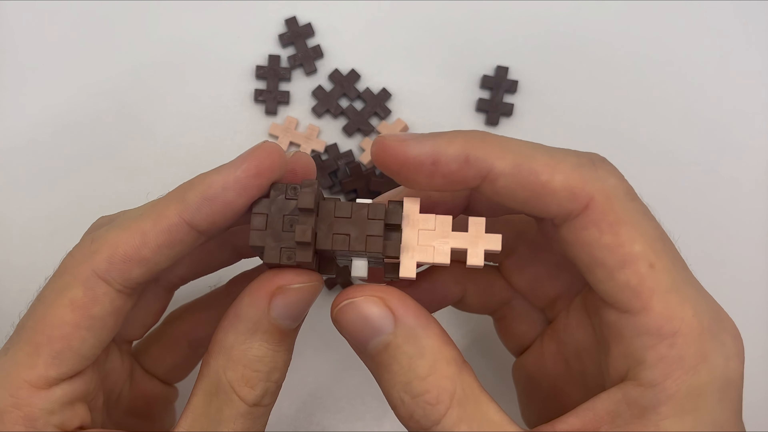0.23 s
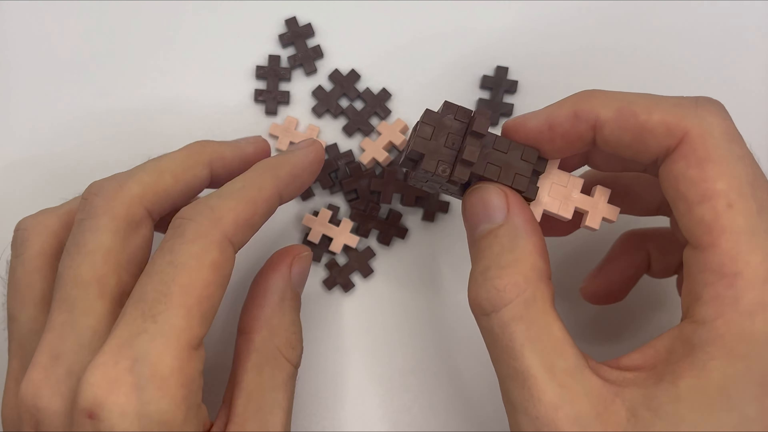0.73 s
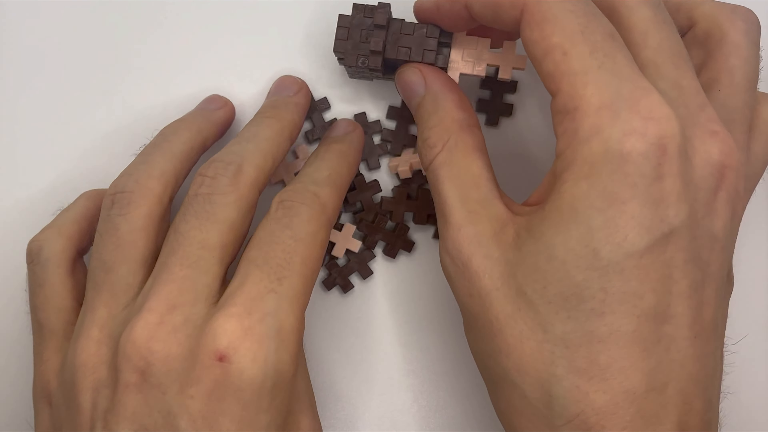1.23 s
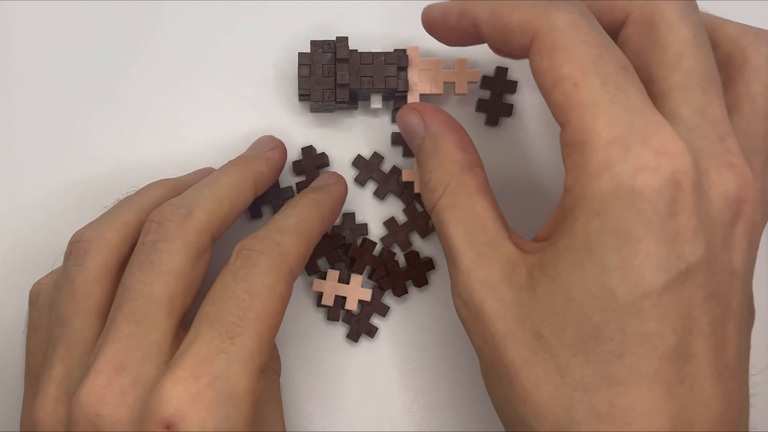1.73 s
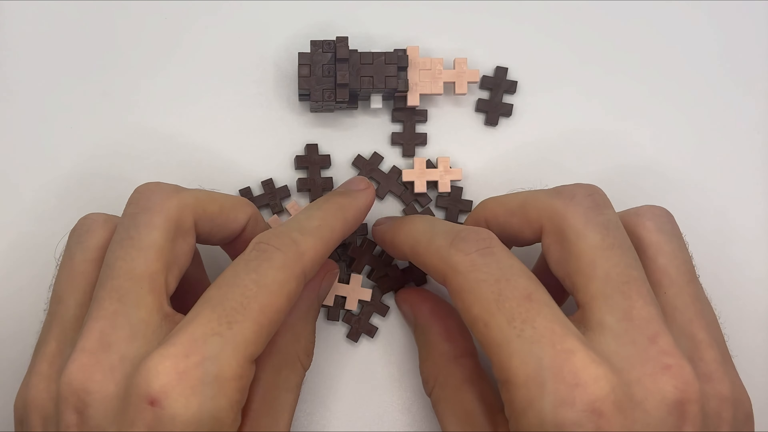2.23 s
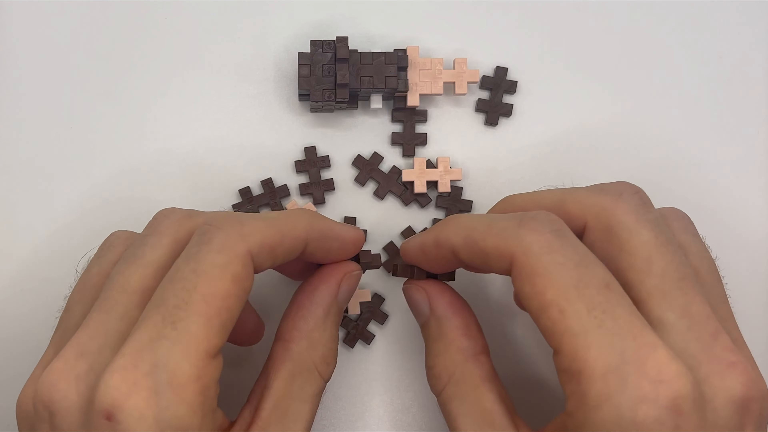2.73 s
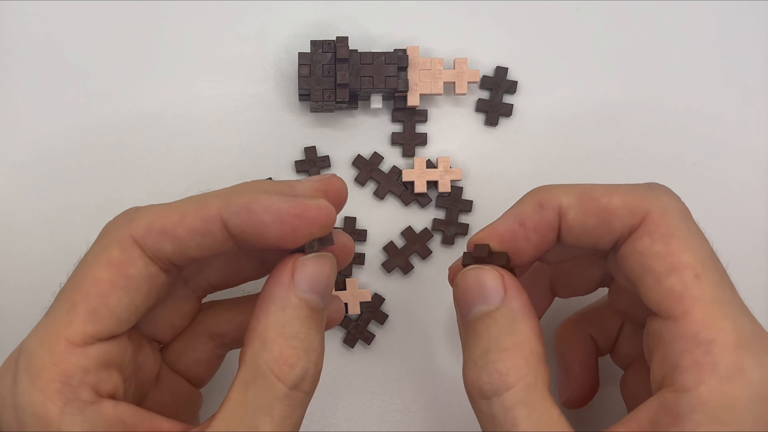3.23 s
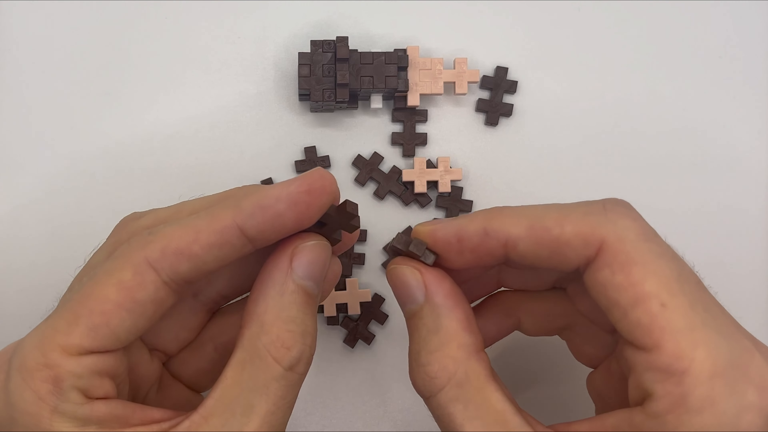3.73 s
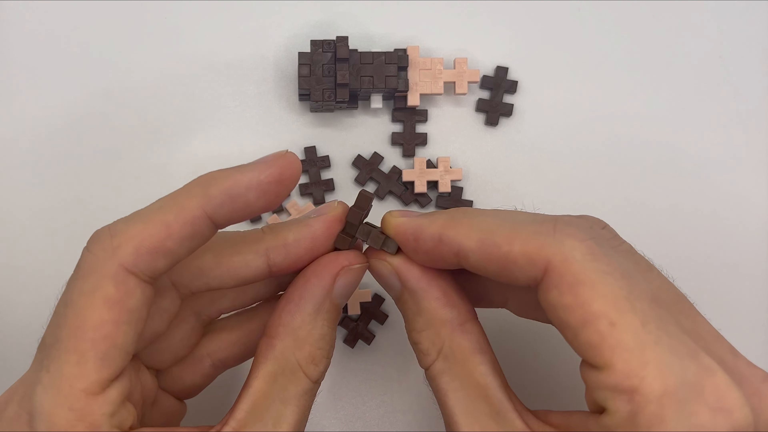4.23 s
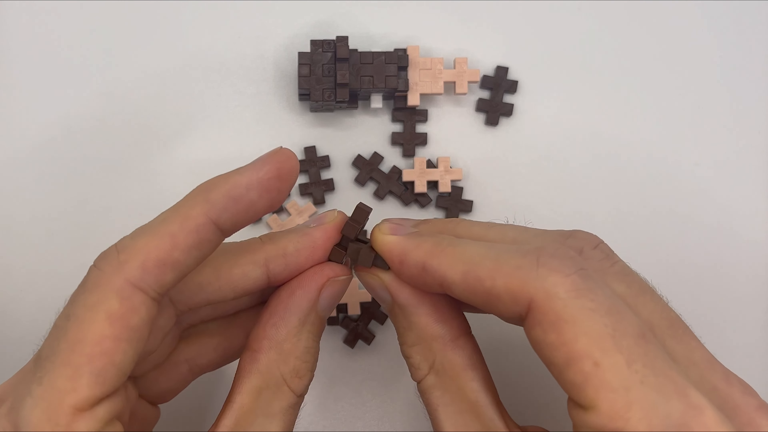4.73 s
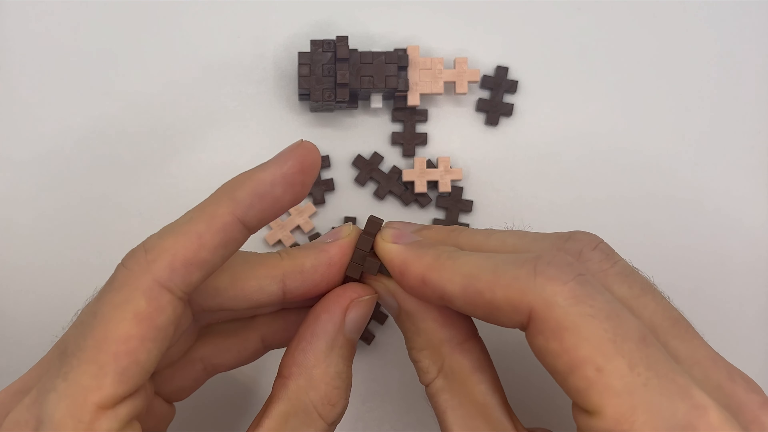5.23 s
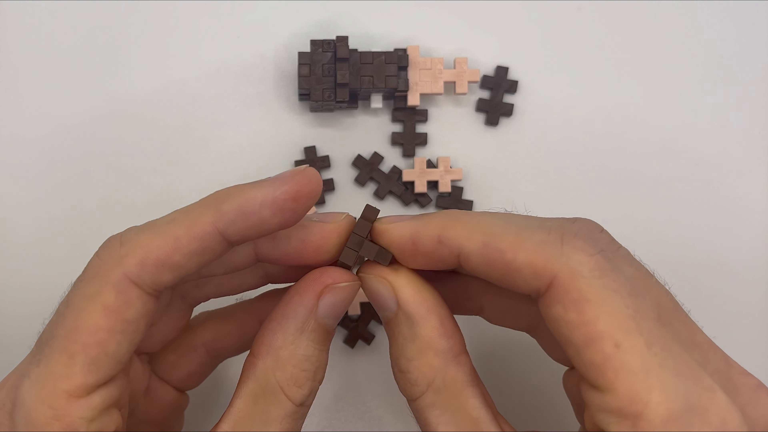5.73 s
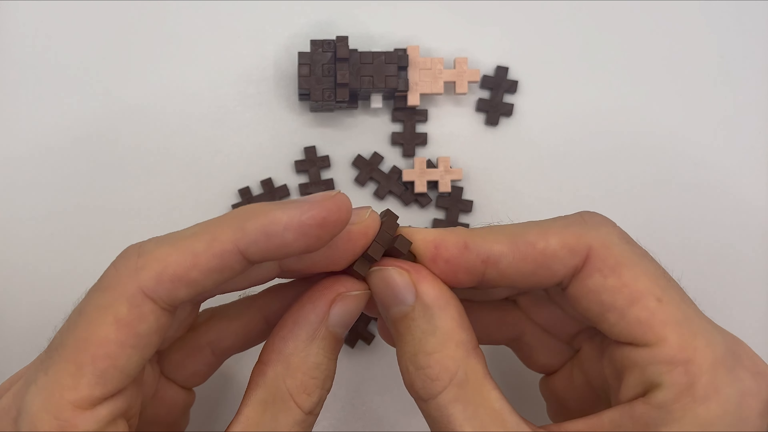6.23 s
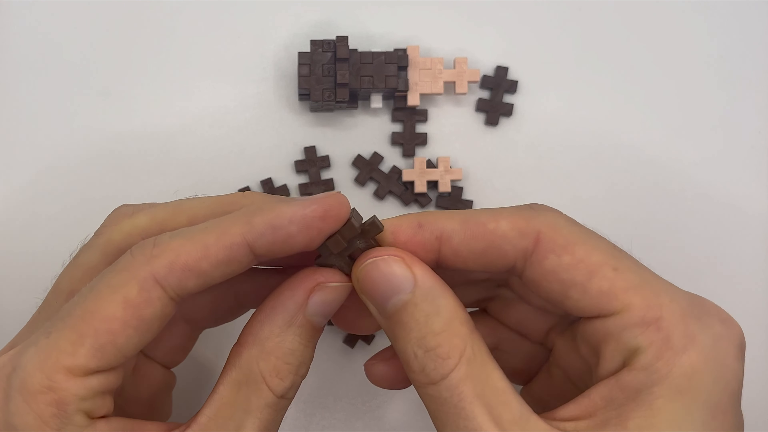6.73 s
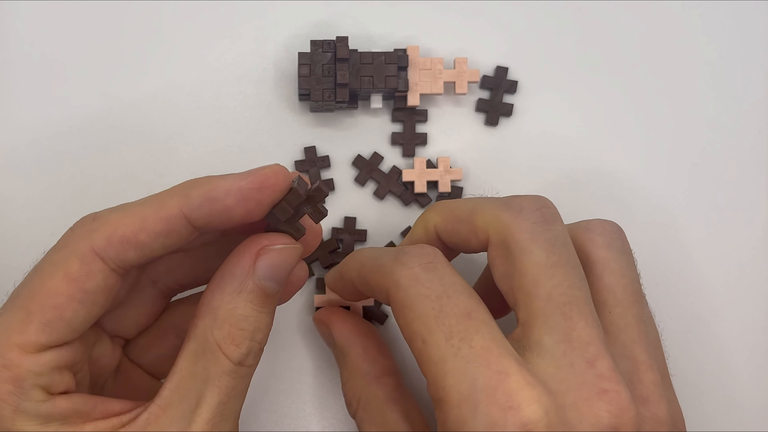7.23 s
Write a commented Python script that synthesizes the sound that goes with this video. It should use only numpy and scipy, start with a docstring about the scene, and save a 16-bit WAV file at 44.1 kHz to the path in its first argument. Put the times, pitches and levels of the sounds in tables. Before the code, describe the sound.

A small plastic model scrapes and clacks down on a tabletop, loose pieces rattle, then faint joint ticks and a last sharp click in a quiet room.

```python
"""Plastic pieces on a table

Hands slide a small plastic model across a table, set it down and pick loose pieces from a heap.
Knocks and drags excite the modes of the table top; heavy contacts shake the whole table.
Joints tick in short, finger-damped noise bursts. Skin hisses and the table rumbles under leaning arms.
Behind: filtered noise for still air, narrow noise bands for a far fan's hum."""
import sys
import numpy as np
from scipy import signal
from scipy.fft import rfft, irfft, next_fast_len
from scipy.io import wavfile
from scipy.ndimage import uniform_filter1d

SR = 44100
rng = np.random.default_rng(int(sys.argv[2]) if len(sys.argv) > 2 else 0)


def log_audio(samples):
    """Write samples as a 16-bit WAV file to the path given in sys.argv[1]."""
    # one column per channel
    frames = np.atleast_2d(samples).T
    # limit to full scale, then quantise
    limited = np.clip(frames, -1, 1)
    pcm = np.round(limited * 32767).astype(np.int16)
    wavfile.write(sys.argv[1], SR, pcm)


N = 329868
TIME_S = np.arange(N) / SR
RING_S = np.arange(16384) / SR  # time axis of one ring or burst


def amp(db):
    """Decibels to gain."""
    return 10 ** (np.asarray(db) / 20)


def unit(x):
    """Scales to rms 1."""
    return x / np.sqrt(np.mean(x ** 2) + 1e-30)


def read(points, hz):
    """Interpolates a (Hz, dB) spectrum on a log-frequency axis."""
    f, db = np.transpose(points)
    return np.interp(np.log(hz + 1), np.log(f + 1), db)


def add(mix, start_s, sound):
    """Mixes a sound in at start_s."""
    part = mix[max(round(start_s * SR), 0):][:len(sound)]
    part += sound[:len(part)]


def coloured(x, *spectra):
    """Causal (minimum-phase) filter with the dB sum of the given spectra."""
    size = next_fast_len(len(x) + 4096)
    hz = abs(np.fft.fftfreq(size, 1 / SR))
    gain_db = sum(read(points, hz) for points in spectra)
    log_gain = np.log(amp(gain_db))
    response = np.exp(np.conj(signal.hilbert(log_gain)))  # phase from the log gain
    return np.fft.ifft(np.fft.fft(x, size) * response).real[:len(x)]


def noise(points):
    """Steady noise of rms 1 with a given spectrum."""
    gain = amp(read(points, np.fft.rfftfreq(N, 1 / SR)))
    return unit(irfft(rfft(rng.standard_normal(N)) * gain, N))


def hump(hz, db, octaves):
    """Spectrum points of one damped resonance."""
    return [(hz * 2 ** (octaves * k), db / (1 + (2 * k) ** 2)) for k in np.linspace(-4, 4, 33)]


def flat(x, width_hz=450):
    """Evens out a burst's broad colour; keeps its timing and fine ripple."""
    power = uniform_filter1d(abs(rfft(x)) ** 2, int(width_hz * len(x) / SR))
    inverse_db = -10 * np.log10(power)
    return coloured(x, np.transpose([np.fft.rfftfreq(len(x), 1 / SR), inverse_db]))


def dying(t60_s):
    """Envelope that falls 60 dB in t60_s."""
    return np.exp(-np.log(1000) * RING_S / t60_s)


def scatter(db, t60_s):
    """A dying noise cloud of reflections with a given energy."""
    cloud = rng.standard_normal(len(RING_S)) * dying(t60_s) * (RING_S > .0006)
    return amp(db) * cloud / np.linalg.norm(cloud)


def strike(sound, db):
    """Sets the rms of a click's first 4 ms, high-passed at 500 Hz."""
    high_pass = signal.butter(2, 500, "high", fs=SR, output="sos")
    attack = signal.sosfilt(high_pass, sound[:SR // 250])
    return sound * amp(db) / np.sqrt(np.mean(attack ** 2))


def stroke(start_s, end_s, db, rise_s, release_s, slowing_db_per_s=0):
    """Gain of one hand movement: linear rise, even dB slope while it lasts, exponential release."""
    t = np.maximum(TIME_S - start_s, 0)
    held_db = db - slowing_db_per_s * np.minimum(t, end_s - start_s)
    release = np.exp(-np.maximum(TIME_S - end_s, 0) / release_s)
    return np.minimum(t / rise_s, 1) * amp(held_db) * release


def table_ring(db, spread_db):
    """The top's decaying modes; random strengths stand for the spot that is struck."""
    # modes of the table top: f/Hz, level/dB, t60/s
    top_modes = [(919.7, -9, .07), (1057, 3.5, 0.051), (1174, -9, 0.033), (1475, -0.5, 0.076),
                 (1708, -0.5, 0.081), (2001, -4, 0.14), (2610, 3.5, 0.0559), (3250, -1, .05),
                 (3616, -1, 0.069), (4100, -4.5, 0.039), (5400, -6, .04)]
    ring = np.zeros(len(RING_S))
    for hz, mode_db, t60_s in top_modes:
        gain = amp(mode_db + spread_db * rng.standard_normal())
        ring += gain * np.cos(2 * np.pi * hz * RING_S) * dying(t60_s)
    return amp(db) * ring / np.linalg.norm(ring)


def knock(db, weight_db, tick_db, spot_hz, piece_hz):
    """A sharp contact, chatter of the piece, the ring of the top and the room's reflections."""
    # colour of a knock: f/Hz, level/dB
    knock_colour = [(50, -37), (120, -16), (320, -12), (500, -16), (750, -6.5), (1100, -0.5), (1600, -2),
                    (2200, -10), (2900, -11.5), (4200, -16.5), (5200, -23.5), (7500, -24.5), (10500, -31),
                    (15500, -34.5)]
    contact = flat((RING_S == 0) + scatter(db=4, t60_s=0.013) + scatter(db=0.5, t60_s=.06))
    top = table_ring(db=-16.5, spread_db=3)
    room = coloured(scatter(db=-14.5, t60_s=0.3), [(300, 7), (1800, -10), (5000, -7.5), (12000, -12)])
    # the harder the contact, the more clack near 3 kHz comes with the tick
    clack_db = 1 + 0.5 * tick_db
    touch = [(400, weight_db), (620, -2), (900, 0.14), (1900, 0.33),
             (2600, clack_db), (3900, clack_db), (5800, tick_db)]
    spot = hump(spot_hz, db=7, octaves=0.25)
    piece = hump(piece_hz, db=8.5, octaves=0.14)
    return strike(coloured(contact + top + room, knock_colour, touch, spot, piece), db)


def knocks():
    """Pieces land flat or tilted; a tilted one first touches with one edge, softer and duller."""
    # landings: t/s, level/dB, weight under 500 Hz/dB, tick above 5 kHz/dB, struck spot f/Hz,
    # piece f/Hz, lead of the first edge/s (0 = flat)
    landings = [(1.042, -52, 7, 0, 1700, 2100, 0.0027), (1.111, -42.5, -12, -10, 1650, 2370, 0),
                (1.148, -41.5, -3.5, 9, 1690, 2250, 0), (1.315, -30, -7, 4.5, 1125, 3220, 0.011),
                (1.3402, -37, 9, -3, 1250, 2400, 0.0012), (1.4223, -40, 3.5, -1, 1062, 3250, 0.0053),
                (1.6223, -26.5, 12, 1.5, 1070, 3200, .0015), (1.659, -47, 6.5, -1, 1388, 2610, 0),
                (1.696, -25.5, -2, 11, 1500, 3205, 0.00071), (1.784, -30.5, 4.5, -8, 1700, 2575, 0.0027),
                (1.8041, -43.5, 10.5, -4, 1360, 2610, 0.0028), (1.915, -54.5, 9, -15, 1800, 2180, 0.0043),
                (1.9596, -64.5, 16, -16, 1074, 2580, 0.012), (2.2393, -49, 0, -22, 1200, 2540, 0),
                (2.328, -43, -3, -17, 1078, 2488, 0.003), (2.3483, -47, 8.5, -22, 1300, 2446, 0.0017),
                (2.3998, -45.5, 5, -6.5, 1300, 2640, 0.01), (2.4629, -25, 0.5, 1.5, 1130, 1800, 0.0015),
                (2.477, -39.5, 10.5, -4, 1700, 2610, 0.00018), (2.52, -48.5, -10, -5, 1150, 3340, 0.0014),
                (2.5597, -51, -12.5, -2, 1210, 3470, 0.00099), (2.589, -53, 10.5, -8.5, 1107, 2091, 0.001),
                (2.6373, -44, -14.5, -5, 950, 2543, 0), (2.685, -41, -16, -21, 1060, 2680, 0.00047),
                (2.697, -27, -4.5, 4.5, 1083, 5938, 0.0032), (7.2, -51, 2.5, -4, 1060, 3110, 0.0074),
                (7.2991, -50.5, 14.5, 0, 2100, 2720, 0.0036), (7.366, -60.5, 8, 4, 1120, 3640, 0),
                (7.39, -56, 7, -8, 1000, 3645, 0), (7.4064, -27.5, 1.5, 10.5, 1582, 3900, .004)]
    edge_db, edge_tick_db, edge_hz = -6.5, -10, 1200  # the first two relative to the landing
    out = np.zeros(N)
    for start_s, db, weight_db, tick_db, spot_hz, piece_hz, lead_s in landings:
        add(out, start_s, knock(db, weight_db, tick_db, spot_hz, piece_hz))
        if lead_s > 0:
            edge = knock(db + edge_db, weight_db, tick_db + edge_tick_db, edge_hz, piece_hz)
            add(out, start_s - lead_s, edge)
    return out


def thumps(swell_cycles=1.7):
    """Heavy contacts ring the whole table; slow bending waves build up later, so the thud falls in pitch."""
    # bending modes of the whole table: f/Hz, level/dB, t60/s
    frame_modes = [(54, -4.5, 0.17), (112, -5, 0.15), (148, -1, 0.074), (218, -7, 0.0579), (290.6, 0, 0.07),
                   (375, 6, 0.028)]
    # heavy contacts: t/s, gain/dB
    contacts = [(0.474, -58), (1.342, -38.5), (1.621, -24.5), (1.785, -52), (2.401, -58.5), (2.464, -57),
                (2.697, -58), (7.299, -57), (7.404, -37)]
    ring = np.zeros(len(RING_S))
    for hz, db, t60_s in frame_modes:
        swell = np.tanh(RING_S * hz / swell_cycles)
        ring += amp(db) * np.sin(2 * np.pi * hz * RING_S) * dying(t60_s) * swell
    out = np.zeros(N)
    for start_s, db in contacts:
        add(out, start_s, amp(db) * ring)
    return out


def drags(slips_per_s=1400, spread_db=4.0, grit=.4, catch_db=1.43, fast_db=-38):
    """Tiny slips of sliding plastic, and of scraping fingers in the last stroke, excite the table top; they
    clump as corners catch and let go."""
    # strokes dragged over the table, plastic except the last, which is fingers scraping: start/s, end/s,
    # level/dB, rise/s, slowing/(dB/s), piece f/Hz, ring/dB
    slides = [(1.035, 1.542, -38.5, 0.15, 22, 1880, 6), (1.551, 1.777, -63.5, 0.0087, -2, 1900, 6),
              (1.785, 1.833, -49, .012, 52, 1900, 8), (2.225, 2.312, -57.5, 0.013, 40, 1140, 6),
              (2.305, 2.372, -52, 0.027, 35, 1160, 3.5), (2.39, 2.7, -60, .02, 28.5, 1150, -1),
              (7.19, 7.396, -78.5, 0.016, -57, 3235, 12)]
    # the model juddering as it slows down: start/s, end/s, level/dB
    judder_strokes = [(1.323, 1.395, -55), (1.402, 1.448, -50.5), (1.502, 1.535, -59.5)]
    # colour of a dragged piece: f/Hz, level/dB
    drag_colour = [(100, -28.5), (300, -21), (500, -14.5), (750, -6.5), (1100, 2), (1800, -8),
                   (2300, -11.5), (3300, -17.5), (4800, -28), (8000, -32), (15500, -47)]
    # colour of the table's drumming: f/Hz, level/dB
    drum_colour = [(60, -38), (130, -9.5), (200, 1.5), (330, -2), (480, -10), (900, -37.5), (3000, -71.5)]
    drumming_db, drumming_exponent = -56, 0.61  # level in a fast drag; growth with the drag's gain

    is_slip = rng.random(N) < slips_per_s / SR
    slip_gain = amp(spread_db * np.minimum(rng.exponential(1, N), 3))
    slips = is_slip * rng.choice([-1, 1], N) * slip_gain
    catching = amp(catch_db * noise([(8, -11.0), (30, -6), (90, 2), (200, -31), (600, -101)]))
    top = flat((RING_S == 0) + scatter(db=0.0, t60_s=.06)) + table_ring(db=-18.5, spread_db=4.0)
    friction = (unit(slips) + grit * rng.standard_normal(N)) * catching
    rub = signal.fftconvolve(friction, top)[:N]

    drumming = noise(drum_colour)
    out = drumming * sum(stroke(*row, rise_s=0.016, release_s=.02) for row in judder_strokes)
    for start_s, end_s, db, rise_s, slowing_db_per_s, piece_hz, ring_db in slides:
        speed = stroke(start_s, end_s, db, rise_s, 0.0054, slowing_db_per_s)
        moving = speed > amp(-110)
        slow = unit(coloured(rub[moving], drag_colour, hump(piece_hz, ring_db, octaves=0.18)))
        fast = unit(coloured(slow, [(1100, 0.5), (1800, 2.2), (8000, 7.2)]))  # quicker slips are brighter
        share = np.clip(speed[moving] / amp(fast_db), 0, 1)
        out[moving] += ((1 - share) * slow + share * fast) * speed[moving]
        out[moving] += amp(drumming_db) * share ** drumming_exponent * drumming[moving]
    return out


def snaps():
    """A tight joint slips in a tiny noise burst, damped by the fingers."""
    # pieces pressed together: t/s, level/dB, tick above 5 kHz/dB, joint f/Hz
    joints = [(0.4781, -67, -11, 3180), (3.275, -78, -5, 7400), (3.6393, -77.5, 0, 7400),
              (4.154, -76.5, 0, 2500), (4.417, -83, 16, 14040), (4.5804, -64.5, 4, 7050),
              (4.9444, -62, -2, 2300), (5.69, -70, 9, 14200), (5.952, -77.5, 1, 3400),
              (6.061, -77, 0, 3400), (6.4074, -73, -2.5, 6950), (6.4658, -52.5, -1, 3340),
              (6.9047, -74.5, -6, 7500)]
    # colour of a snap: f/Hz, level/dB
    snap_colour = [(80, -53), (250, 11), (450, 2.5), (900, 11), (1300, 3.5), (1700, 7.5), (2300, -0.5),
                   (3500, -1), (8000, 0), (15500, -19)]
    out = np.zeros(N)
    for start_s, db, tick_db, joint_hz in joints:
        slip = flat(scatter(db=5, t60_s=0.029) + scatter(db=-1.0, t60_s=0.073))
        tick = [(3000, 0), (7000, tick_db)]
        joint = hump(joint_hz, db=8, octaves=0.47)
        add(out, start_s, strike(coloured(slip, snap_colour, tick, joint), db))
    return out


def hands():
    """Skin brushes over the top as hiss; the table sways as low rumble whenever the arms lean on it."""
    # skin brushing over the table: start/s, end/s, level/dB, rise/s
    brush_strokes = [(0.457, 0.74, -77.5, 0.019), (0.748, 1.402, -73.5, 0.14), (1.727, 1.803, -73, .06),
                     (2.719, 2.978, -80.5, 0.041)]
    # arms leaning on the table: start/s, end/s, level/dB
    arm_leans = [(1.024, 1.09, -53), (1.322, 1.387, -50), (1.65, 1.748, -52), (2.369, 2.498, -54),
                 (4.947, 5.012, -59.5), (5.88, 6.247, -62.5), (6.378, 6.644, -57.5), (6.754, 7.38, -66.5),
                 (7.389, 7.464, -49)]
    # hiss of the skin: f/Hz, level/dB
    brush_colour = [(200, -6.5), (1000, -0.5), (2500, -1.5), (5000, -2), (8000, 1), (11000, -3),
                    (15500, -10.5)]
    # rumble of the swaying table: f/Hz, level/dB
    sway_colour = [(10, -20), (25, -8), (36, -4.5), (50, -0.5), (58, -12), (75, -21.5), (130, -31.5),
                   (300, -66), (1000, -88.5)]
    resting_db = -70  # sway under arms at rest
    brushing = sum(stroke(*row, release_s=0.07, slowing_db_per_s=6.5) for row in brush_strokes)
    leaning = amp(resting_db) + sum(stroke(*row, rise_s=0.066, release_s=.035) for row in arm_leans)
    return noise(brush_colour) * brushing + noise(sway_colour) * leaning


def room_tone():
    """Still air as shaped noise, and the narrow, wavering noise bands of a far fan."""
    # still air: f/Hz, level/dB
    air_colour = [(53, -32), (90, 1), (135, -6), (229, -12.5), (261, -0.5), (322, -14), (374, -6.5),
                  (407, -16), (822, -15.5), (1340, -21.5), (1460, -19.5), (2050, -25), (14500, -31.5)]
    # fan hum: f/Hz, width/Hz, level/dB
    fan_bands = [(48.96, 3.3, -70.5), (267.1, 18, -86.5), (373, 8.1, -97), (1417.6, 30, -95.5)]
    air_db = -77
    f_hz = np.fft.rfftfreq(N, 1 / SR)
    out = amp(air_db) * noise(air_colour)
    for hz, width_hz, db in fan_bands:
        resonance = 1 / (1 + (2 * (f_hz - hz) / width_hz) ** 2)
        out += amp(db) * unit(irfft(rfft(rng.standard_normal(N)) * resonance, N))
    return out


def scene():
    """Pieces, hands, table and room at one close microphone."""
    return (knocks() + thumps() + drags() + snaps() + hands() + room_tone())[None]


def record(dry):
    """Band limit: linear-phase low-pass."""
    edge_hz = 15800
    low_pass = signal.firwin(255, edge_hz, window=("kaiser", 8), fs=SR)
    return signal.oaconvolve(dry, low_pass[None], "same")


dry = scene()
out = record(dry)
log_audio(out)
```